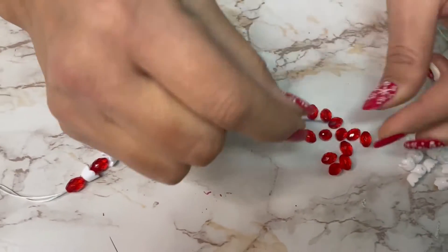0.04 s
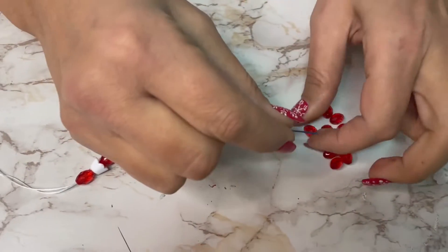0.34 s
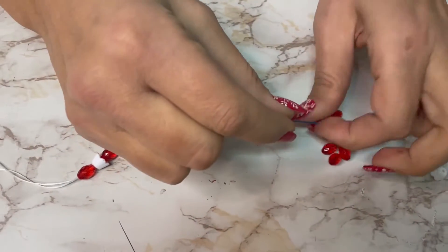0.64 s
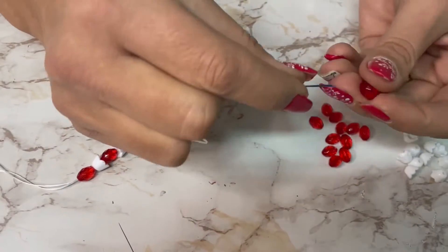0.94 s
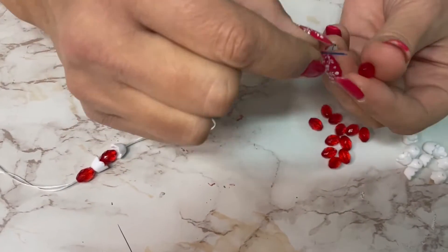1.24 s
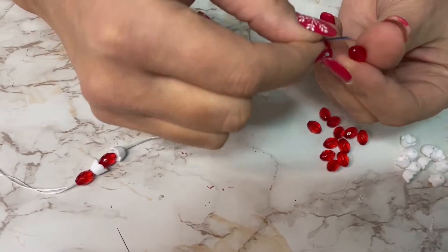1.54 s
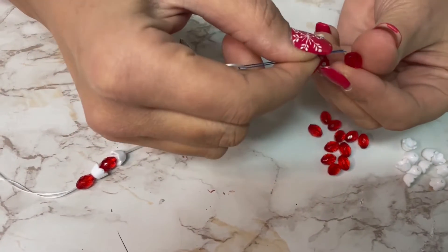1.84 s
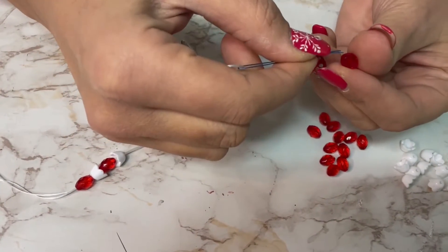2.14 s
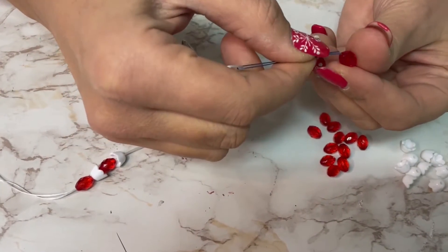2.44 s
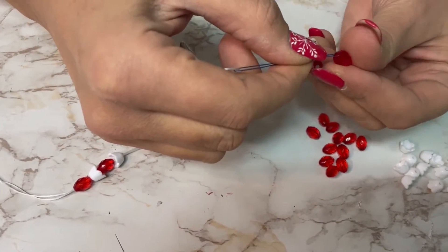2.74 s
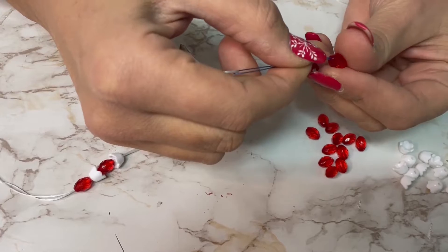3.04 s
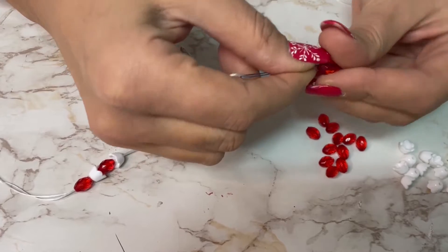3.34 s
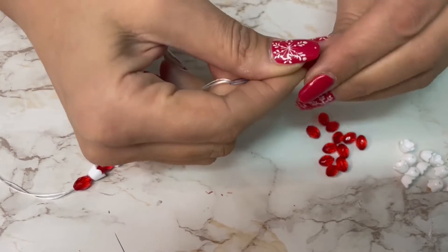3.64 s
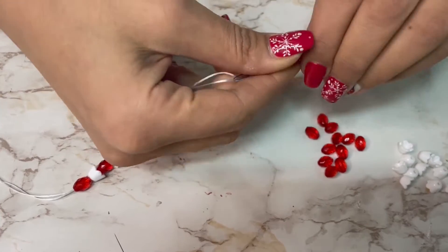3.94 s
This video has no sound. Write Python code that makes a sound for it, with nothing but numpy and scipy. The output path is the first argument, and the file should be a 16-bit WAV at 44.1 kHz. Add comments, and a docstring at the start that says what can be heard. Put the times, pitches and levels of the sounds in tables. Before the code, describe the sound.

Small beads tick and clink as fingers pick them up, in a humming room.

```python
"""Threading glass beads

Glass beads are picked off a hard table and threaded on a needle, close by in a small room.
A fingernail knocks, beads skitter and clink: each tap rings a few tones that die away quickly.
Fingertips rub in many tiny slips. Behind it all, over the room's rumble and hiss,
a motor hums with a slow throb and a thin whine."""
import sys
import numpy as np
from scipy import signal
from scipy.io import wavfile

SR = 44100
rng = np.random.default_rng(int(sys.argv[2]) if len(sys.argv) > 2 else 0)


def pcm_store(signal):
    """Save signal as 16-bit PCM."""
    levels = np.round(np.clip(np.atleast_2d(signal), -1, 1) * 32767)
    wavfile.write(sys.argv[1], SR, levels.astype(np.int16).T)


N = 176400
T = np.arange(N) / SR


def from_db(db):
    """Turn decibels into a number to multiply by."""
    return 10 ** (np.asarray(db) / 20)


def rms_one(x):
    """Scale a sound so that its average strength (rms) is 1."""
    return x / np.sqrt(np.mean(x ** 2) + 1e-20)


def unit_energy(x):
    """Scale a sound so that its energy, averaged over the channels, is 1."""
    return rms_one(x) / np.sqrt(x.shape[-1])


def at_hz(points, hz):
    """Read a table at any pitch, sliding between its rows."""
    pitches, values = np.transpose(points)
    return np.interp(np.log(hz), np.log(pitches), values)


def pan(db):
    """Left and right gains that make the left side louder by db."""
    return from_db(np.array([[.5], [-.5]]) * db)


def band(x, low, high, order=2):
    """Keep the part of a sound between two pitches."""
    sos = signal.butter(order, [low, min(high, .45 * SR)], "band", fs=SR, output="sos")
    return signal.sosfilt(sos, x + 1e-18)


def dull(x, cutoff_hz):
    """Soften the treble above the cutoff."""
    return signal.lfilter(*signal.butter(2, cutoff_hz, fs=SR), x)


def drift(rate_hz):
    """A slow random wander, about 1 in size."""
    pole = np.exp(-200 * np.pi * rate_hz / SR)
    slow = signal.lfilter([1], [1, -2 * pole, pole * pole], rng.standard_normal(N // 100 + 2002))[2000:]
    return np.interp(np.arange(N) / 100, np.arange(len(slow)), rms_one(slow))


# How far the background leans to the left: pitch_hz, left_minus_right_db
LEFT_LEAN = [(60, -1.5), (150, 3.5), (370, 1.5), (910, 2), (2260, 1.5), (5610, 2.5), (13900, -2.5)]

def widen(mid, side, likeness, hz):
    """Mix two noises into left and right; a likeness near 1 sounds narrow, near 0 wide."""
    likeness = np.clip(likeness, -.9, .995)
    spread = np.sqrt((1 - likeness) / (1 + likeness)) * np.array([[1], [-1]])
    return (mid + spread * side) * pan(at_hz(LEFT_LEAN, hz))


# The tone colour of the room's noise: pitch_hz, relative_level_db
AIR_COLOUR = [(25, -37), (36, -22), (52, 2), (88, -14.5), (115, -3), (145, -0.5), (260, -4.5), (330, -10),
              (490, -13.5), (700, -23.5), (1100, -26), (2200, -35), (4300, -41), (6600, -46), (8200, -64),
              (10500, -54.5), (13000, -86.5)]
# How alike that noise is in the two ears: pitch_hz, likeness
AIR_LIKENESS = [(50, 0.5), (130, 0.83), (260, 0.91), (500, 0.017), (1500, -0.02), (3500, 0.48),
                (6300, 0.36), (8100, -1.32), (11000, 1.5)]

def air(level_db=-46.5, flicker_db=1.58):
    """The room rumbles and hisses; each band of the noise flickers a little."""
    out, edges = 0, 22 * 2 ** (np.arange(29) / 3)   # three bands to an octave
    white = rng.standard_normal((2, 2, N + SR // 4))
    for k, (low, high) in enumerate(zip(edges, edges[1:])):
        mid, side = band(white[k % 2], low, high, order=3)[:, -N:]
        hz = np.sqrt(low * high)
        gain = from_db(at_hz(AIR_COLOUR, hz) + flicker_db * drift(18.4))
        out = out + gain * widen(mid, side, at_hz(AIR_LIKENESS, hz), hz)
    return from_db(level_db) * rms_one(out)


def wavering(hz, waver_hz, rate_hz):
    """A pure tone whose pitch wanders a little."""
    return np.sqrt(2) * np.sin(2 * np.pi * np.cumsum(hz + waver_hz * drift(rate_hz)) / SR)


# The throb of the motor's main tone: time_s, relative_level_db
MOTOR_THROB = [(0.0, -40.5), (0.18, -54), (0.22, -32.5), (0.36, -51), (0.56, -37.5), (0.63, -44.5),
               (0.78, -32), (1.35, -51), (1.4, -39), (1.96, -37), (2.42, -49), (3.0, -36), (3.1, -46),
               (3.41, -51.5), (3.58, -32.5), (3.75, -47.5), (3.9, -34), (4.0, -46)]
# The other tones in the hum: pitch_hz, level_db, width_hz, likeness
HUM_TONES = [(48.1, -51.5, 0.13, .9), (59.2, -47.5, 4.2, 1), (76.7, -54.5, 0.71, 0.99),
             (105.4, -50, 2.83, 0.96), (135.6, -56.5, 2.5, 0.98), (165.5, -53.5, 2.65, 0.74),
             (178.5, -52, 5.4, 1), (201.3, -50.5, 2.84, 0.93), (221.3, -58, 1.2, .8), (238.8, -50, 1.01, 1),
             (257.5, -58.5, 6.7, 1), (278.9, -54, 1.3, 0.3), (398.6, -64.5, 2.7, 1), (430.5, -64, 5, 0.5),
             (498, -65, 2.1, 1), (582, -68, 1.8, 0.28), (698, -77.5, 3.5, 0.22), (775, -76.5, 5.8, 0.33),
             (1294, -94, 1, .3), (1516, -87, 1.6, 0.11), (1810, -87.5, 2.6, 0.043)]
# How the higher of those tones swell and sink: time_s, relative_level_db
UPPER_SWELL = [(0.0, 1), (.2, 2.5), (.55, 0), (.8, 5), (1.3, -1.5), (2.2, 0), (2.65, 3), (3.3, 0.5),
               (4, -1.5)]

def motor(swell_above_hz=190):
    """A motor hums: one throbbing tone, unsteady tones around it and a thin whine."""
    throb_db = np.interp(T, *np.transpose(MOTOR_THROB)) - 1.5
    out = from_db(throb_db) * wavering(116.6, waver_hz=1.322, rate_hz=1.65) * pan(2.5)
    swell_db = np.interp(T, *np.transpose(UPPER_SWELL))
    swell_db = 0.96 * (swell_db - swell_db.mean())
    for hz, db, width, likeness in HUM_TONES:
        turn = 2 * np.pi * hz * T
        mid, side = (rms_one(drift(width) * np.cos(turn) + drift(width) * np.sin(turn)) for _ in "ms")
        out = out + from_db(db + swell_db * (hz > swell_above_hz)) * widen(mid, side, likeness, hz)
    whine = from_db(-67.5) * wavering(1093.7, waver_hz=1.95, rate_hz=5.3) * pan(-8.5)
    return out + whine


def bump(peak_s=2.55, fade_s=0.037, pitch_hz=59.4, level_db=-32.5):
    """One soft, low bump, only a few waves long."""
    swell = np.exp(-((T - peak_s) / fade_s) ** 2)
    return from_db(level_db) * swell * np.sin(2 * np.pi * pitch_hz * T)


def room_tail(noise, fade_s, onset_s=0.0017, wall_s=0.024, wall_db=5):
    """The room's echo: noise that swells as the walls answer and falls 60 dB in fade_s."""
    t = T[:noise.shape[-1]]
    decay = np.exp(-np.log(1000) * t / fade_s) * (t > onset_s)
    walls = from_db(wall_db * np.exp(-((t - wall_s) / 0.0038) ** 2))
    return unit_energy(noise * decay * walls)


def room(x, echo_db):
    """A sound together with its echo in the room."""
    tail = room_tail(rng.standard_normal((2, SR // 2)), fade_s=0.59)
    return x + from_db(echo_db) * signal.fftconvolve(x, tail, axes=1)[:, :N]


# Fingertips and beads rub: start_s, length_s, level_db, pitch_hz, width_octaves
RUB_STROKES = [(0.342, 0.036, -61, 3970, 1.4), (0.585, 0.028, -59, 3850, 1.3),
               (0.599, 0.13, -58, 2300, 1.66), (0.63, 0.041, -65, 5470, 0.57),
               (0.714, 0.022, -61.5, 4960, 1), (0.762, 0.026, -66, 4900, 0.47),
               (0.77, .055, -80, 11500, .45), (1.103, .04, -83, 10800, .4), (3.36, 0.08, -74, 2800, 0.77),
               (3.452, 0.05, -68.5, 2400, 0.81), (3.294, .14, -85.5, 10500, .3),
               (3.589, 0.092, -65, 2400, 0.94), (3.646, 0.1, -81, 10400, .5),
               (3.733, 0.11, -79, 10300, 0.5), (3.896, 0.025, -81, 10800, 0.37)]

def rubs(slips_per_s=3500, spread_db=3.5):
    """Each rub is a stream of tiny slips that swells and fades."""
    out = np.zeros((2, N))
    for start_s, length_s, db, hz, octaves in RUB_STROKES:
        slips = rng.random(N) < slips_per_s / SR
        sizes = from_db(spread_db * np.minimum(rng.exponential(1, N), 4))
        grains = slips * sizes * (rng.standard_normal(N) + .5 * rng.standard_normal((2, N)))
        stroke = np.sin(np.pi * np.clip((T - start_s) / length_s, 0, 1))
        edge = 2 ** (octaves / 2)
        out += from_db(db) * stroke * rms_one(band(grains, hz / edge, hz * edge, order=3))
    return out * pan(3)


def weak_tones(tones):
    """Three noises coloured like the given tones; they stand for an object's many weak tones."""
    edges = np.geomspace(tones[0][0] * .85, tones[-1][0] * 1.1, 25)
    tone_hz, tone_db = np.transpose(sorted(map(tuple, tones)))
    colour = np.transpose([tone_hz, tone_db - 10 * np.log10(np.gradient(tone_hz) + 1)])   # dB per Hz
    white = rng.standard_normal((2, 3, N))
    return rms_one(sum(from_db(at_hz(colour, np.sqrt(low * high))) * band(white[k % 2], low, high)
                       for k, (low, high) in enumerate(zip(edges, edges[1:]))))


def taps(hits, tones, pan_db, left_lag_s, noise_db, echo_db, echo_s, echo_hz):
    """Each tap rings, falling 60 dB in ring_s; its sound bounces off the table and lingers in the room."""
    out, t = np.zeros((2, N + SR)), T[:SR // 2]
    noise = np.tile(weak_tones(tones), 2)
    for start_s, db, cutoff_hz, ring_s in hits:
        span = slice(int(start_s * SR), int(start_s * SR) + len(t))
        ring = 0
        for k, (hz, tone_db) in enumerate(tones):
            # every tap and each ear gets a slightly different mix of tones
            strength = (-1) ** k * from_db(tone_db + rng.standard_normal((2, 1)))
            ring = ring + strength * np.sin(2 * np.pi * hz * t)
        decay = np.exp(-np.minimum(np.log(1000) * t / ring_s, 20))
        hit = (rms_one(ring) + from_db(noise_db) * noise[2, span]) * decay
        hit = hit + from_db(-14) * np.roll(hit, int(.0013 * SR), axis=1)   # echo off the table top
        hit[0] = np.interp(t - left_lag_s, t, hit[0], left=0)
        tail = dull(room_tail(noise[:2, span], echo_s), echo_hz)
        hit = unit_energy(hit * pan(pan_db)) + from_db(echo_db) * tail
        hit = dull(hit, cutoff_hz)   # a softer touch sounds duller
        out[:, span] += from_db(db) * unit_energy(hit) * np.sqrt(SR * ring_s / np.log(1000))
    return out[:, :N]


# Glass meets glass: start_s, level_db, cutoff_hz, ring_s
CLINK_HITS = [(0.005, -54.5, 15900, 0.019), (0.8243, -35.5, 16300, 0.009), (0.9641, -43.5, 16100, 0.013),
              (3.2838, -59, 7000, 0.0056)]
# The tones in a clink: pitch_hz, relative_level_db
CLINK_TONES = [(5900, -18), (6800, -8), (8200, -38), (9520, -11.5), (10600, -7.5), (11400, -5.5),
               (12150, 3), (12800, -6), (13650, -1), (14550, -14)]

def clinks():
    """Beads hit each other with a very short, high ring."""
    return taps(CLINK_HITS, CLINK_TONES, pan_db=4, left_lag_s=.000095, noise_db=2,
                echo_db=-10, echo_s=0.28, echo_hz=10500)


# A nail slips off a bead: start_s, level_db, cutoff_hz, ring_s
SNAP_HITS = [(3.2965, -45, 5500, 0.054)]
# The tones in the snap: pitch_hz, relative_level_db
SNAP_TONES = [(860, -9), (1150, -7), (1540, -3), (2153, 1), (2480, -3), (2972, -4), (3343, -1), (3950, -6),
              (4550, -11), (5500, -18), (6900, -16), (9800, -8)]

def snap():
    """A nail snaps off the bead held in the fingers."""
    return taps(SNAP_HITS, SNAP_TONES, pan_db=5, left_lag_s=.00003, noise_db=-1,
                echo_db=-4.5, echo_s=0.4, echo_hz=13000)


# Beads and needle touch the table: start_s, level_db, cutoff_hz, ring_s
TICK_HITS = [(0.3607, -49, 8050, 0.023), (0.3775, -50, 4940, 0.015), (0.4205, -50, 7000, 0.016),
             (0.6248, -49.5, 7000, 0.016), (0.6363, -42.5, 7000, 0.024), (0.6472, -54, 7500, .012),
             (0.6555, -40.5, 12000, 0.011), (0.6598, -50, 7500, 0.007), (0.672, -42, 13000, 0.0096),
             (0.6755, -62, 8000, 0.0082), (0.7112, -55, 8000, 0.0079), (0.7160, -50, 8000, 0.0088),
             (0.7215, -57, 8000, .009), (0.7255, -62, 8000, 0.0077), (0.7338, -66, 8000, 0.0076),
             (0.767, -52.5, 7000, 0.01), (0.7725, -51, 7000, 0.012), (3.957, -56.5, 14000, 0.0088)]
# The tones in a tick: pitch_hz, relative_level_db
TICK_TONES = [(820, 3), (1250, -5.5), (1680, 1), (2450, -2.5), (2900, 4.5), (3620, 2.5), (4190, 6.5),
              (4600, 1.5), (5320, -7), (5870, 4), (6600, 2), (7900, -13), (10100, -2.5), (12000, -7.5)]

def ticks():
    """Beads and needle skitter on the hard table top in light, quick taps."""
    return taps(TICK_HITS, TICK_TONES, pan_db=7, left_lag_s=.000015, noise_db=-1,
                echo_db=-6.5, echo_s=0.33, echo_hz=11000)


def table_boom(hits, pitch_hz=234.5, relative_db=-12, rise_s=0.011, fade_s=0.45):
    """A knock sets the table booming: the harder the knock, the louder the boom."""
    swell = 0
    for start_s, db, _, _ in hits:
        age = np.maximum(T - start_s, 0)
        swell = swell + from_db(db + relative_db - 60 * age / fade_s) * np.minimum(age / rise_s, 1)
    return swell * rms_one(band(rng.standard_normal(N), pitch_hz / 1.21, pitch_hz * 1.21, order=3))


# A fingernail hits the table: start_s, level_db, cutoff_hz, ring_s
KNOCK_HITS = [(0.1632, -29, 10000, 0.022)]
# The tones in the knock: pitch_hz, relative_level_db
KNOCK_TONES = [(700, -8), (880, -6), (1060, -5), (1265, -4), (1480, -3), (1800, -3), (2400, 1),
               (2640, -0.5), (3330, 2), (3740, -4.5), (4260, 3), (4620, -3.5), (4870, -6), (5450, -8.5),
               (6300, -4), (6900, -8), (8100, -16.5), (10000, -14)]

def knock():
    """A fingernail knocks on the table: a sharp click with a low boom under it."""
    click = taps(KNOCK_HITS, KNOCK_TONES, pan_db=5.5, left_lag_s=.00003, noise_db=-4.5,
                 echo_db=-1, echo_s=0.45, echo_hz=4400)
    return click + table_boom(KNOCK_HITS)


def scene():
    """Fingers and beads at work, over the hum of the room."""
    background = air() + motor() + bump()
    return background + room(rubs(), echo_db=-7) + clinks() + snap() + ticks() + knock()


def record(dry):
    """Cut away the very highest treble."""
    stop_hz = 16500
    return signal.sosfilt(signal.cheby2(12, 60, stop_hz, fs=SR, output="sos"), dry)


dry = scene()
out = record(dry)
pcm_store(out)
```